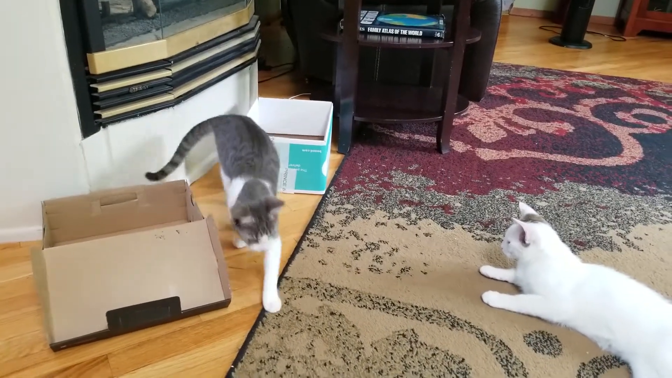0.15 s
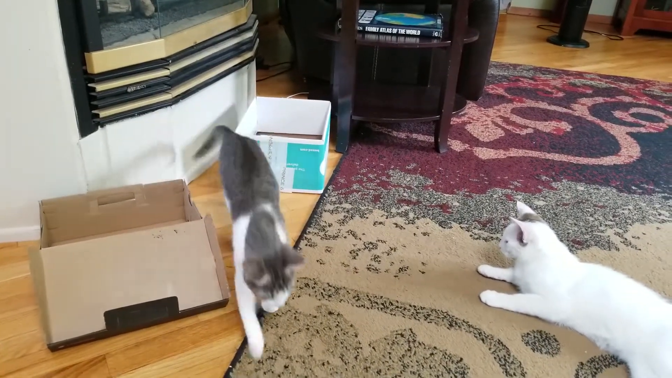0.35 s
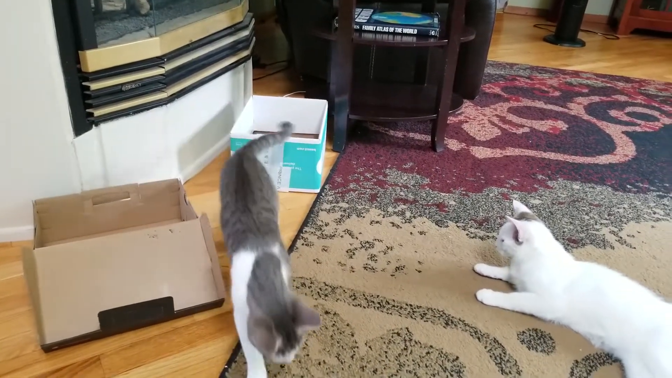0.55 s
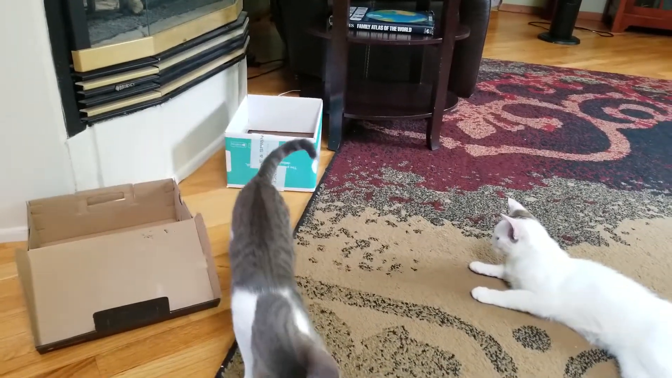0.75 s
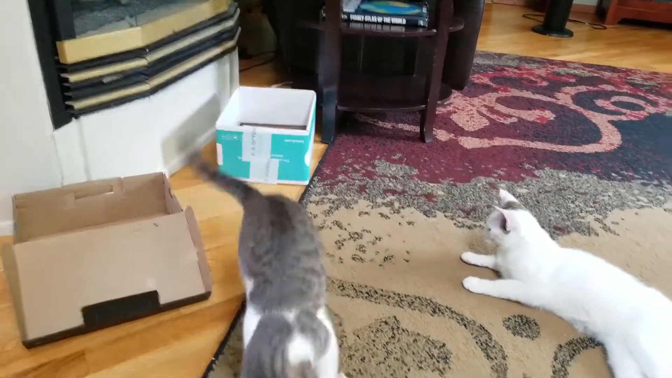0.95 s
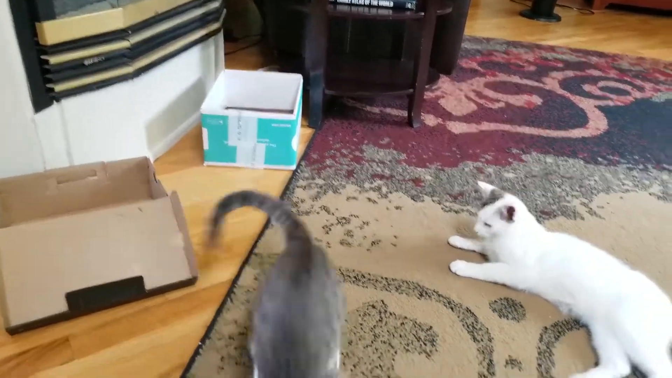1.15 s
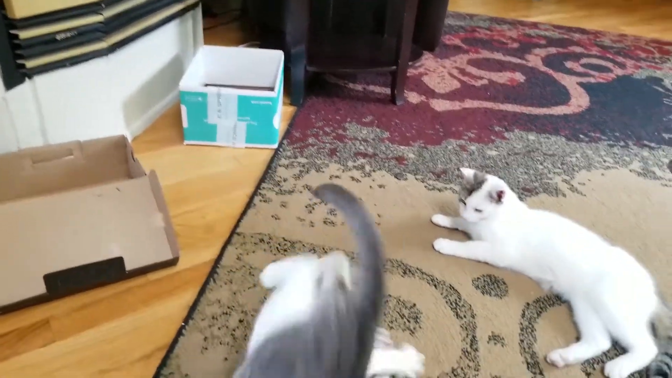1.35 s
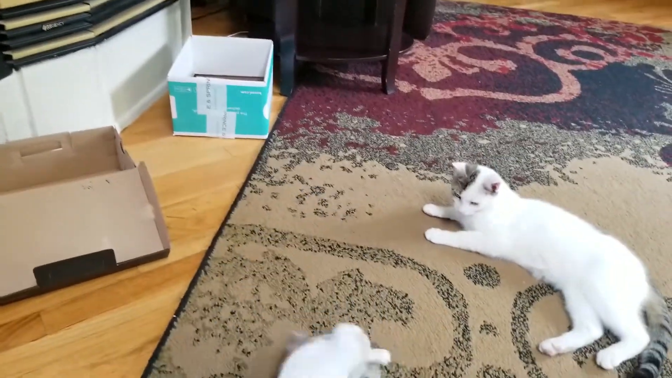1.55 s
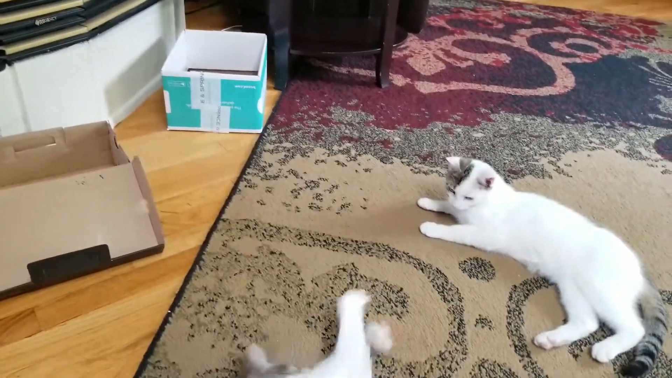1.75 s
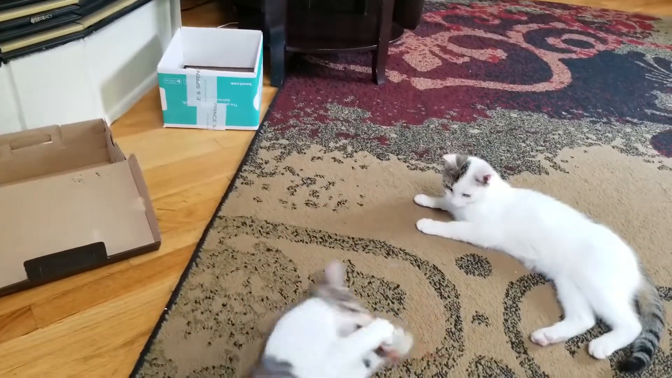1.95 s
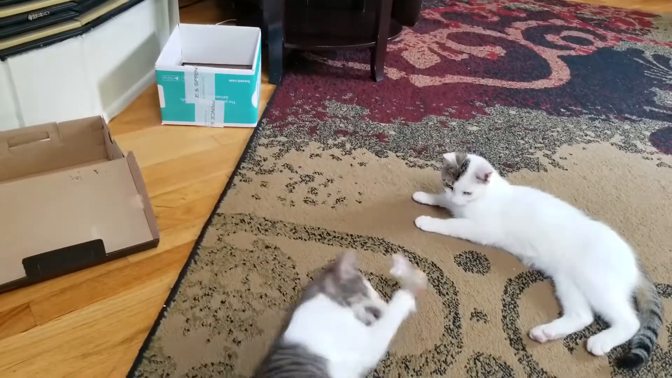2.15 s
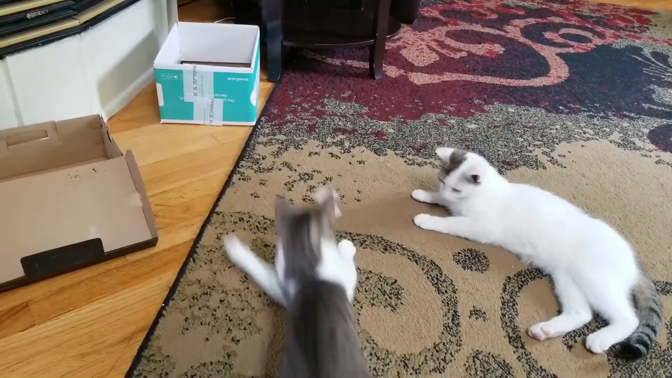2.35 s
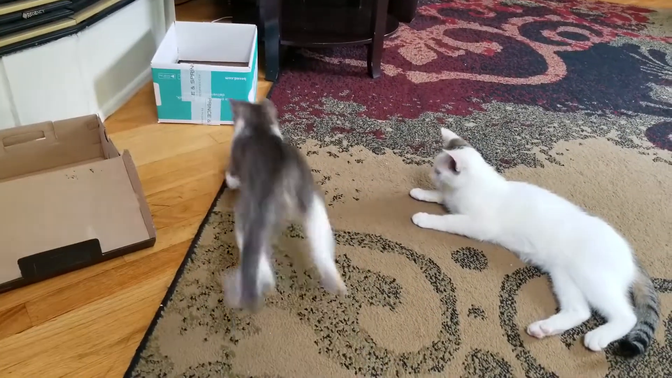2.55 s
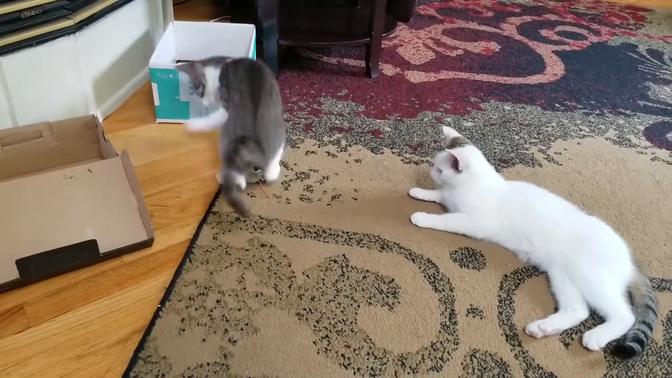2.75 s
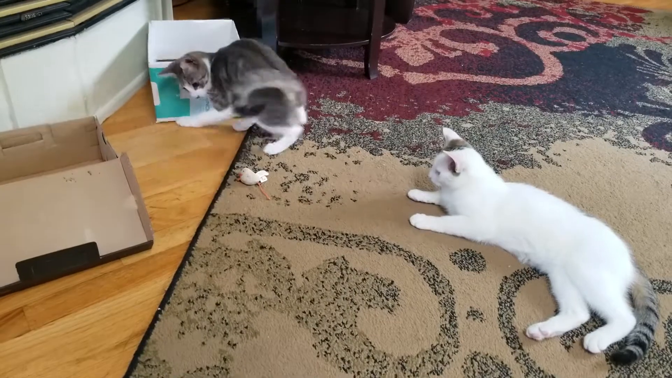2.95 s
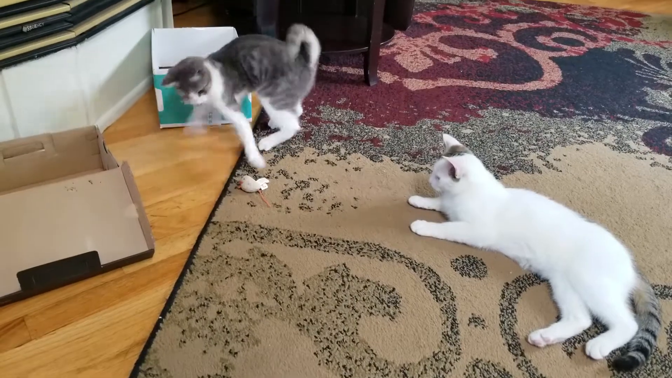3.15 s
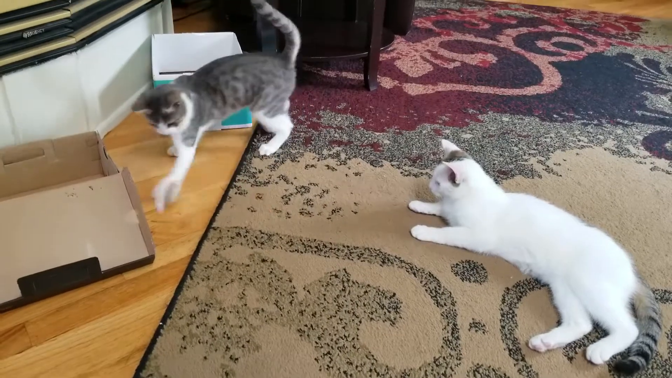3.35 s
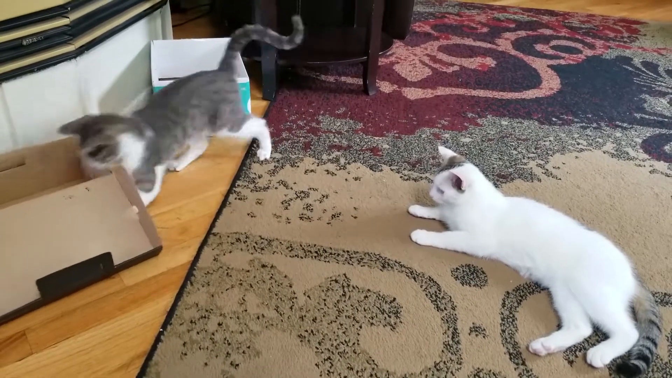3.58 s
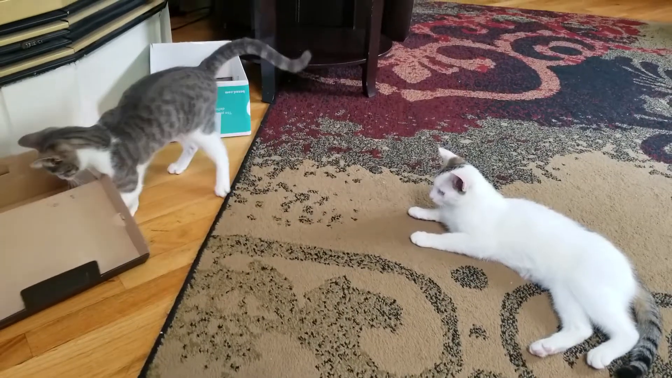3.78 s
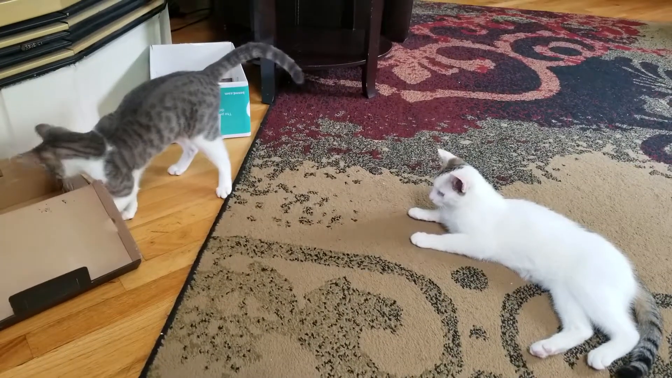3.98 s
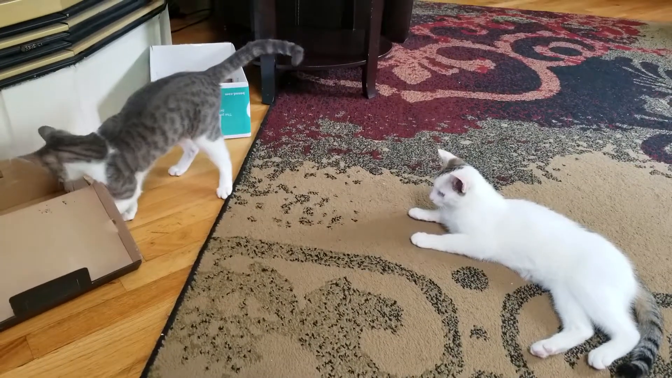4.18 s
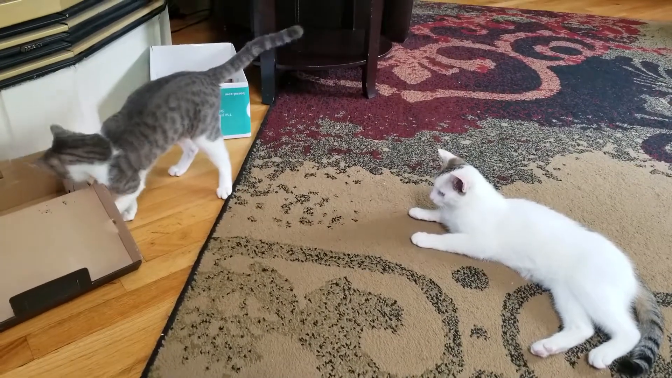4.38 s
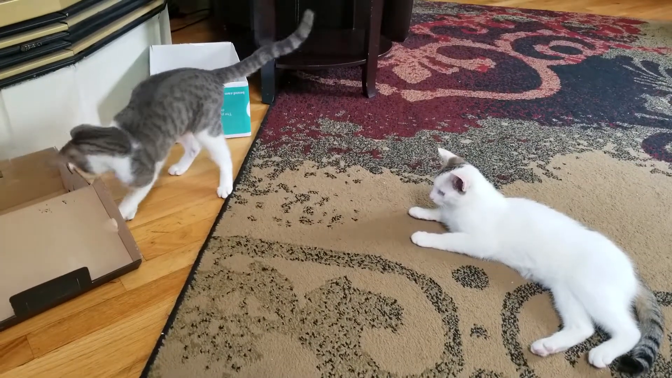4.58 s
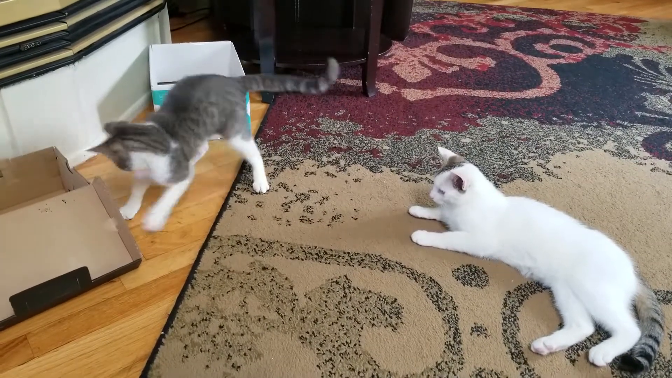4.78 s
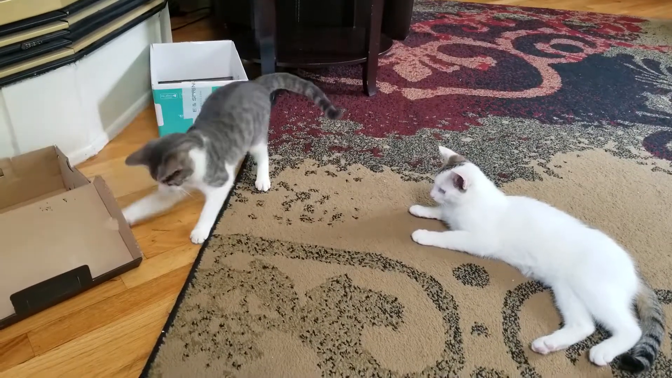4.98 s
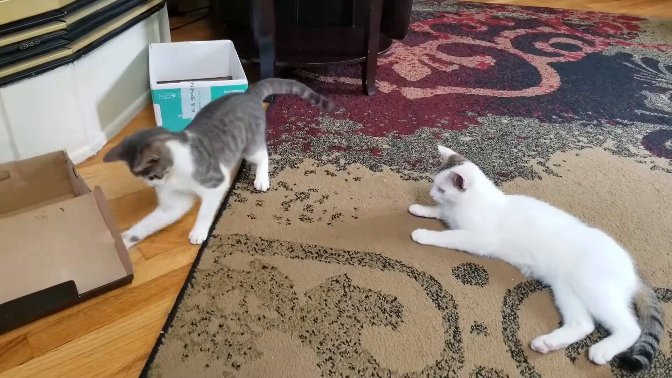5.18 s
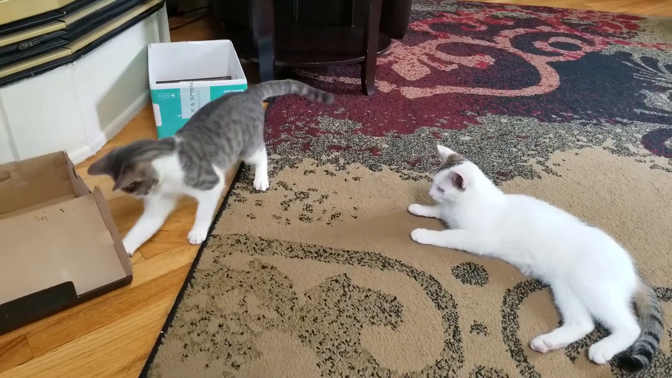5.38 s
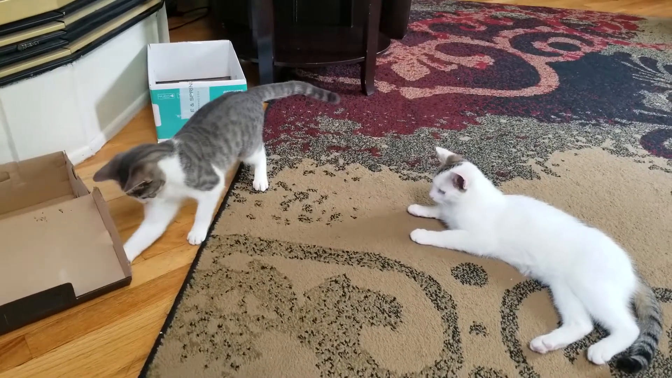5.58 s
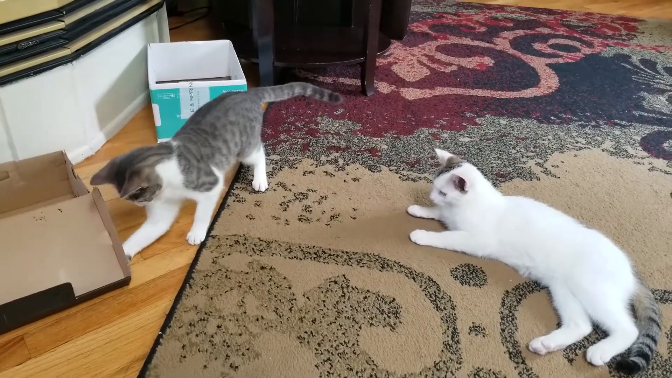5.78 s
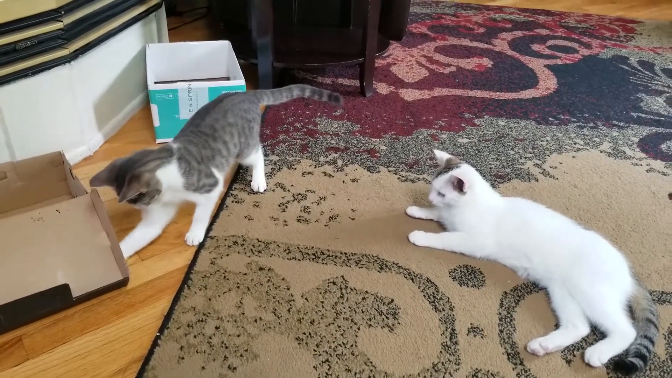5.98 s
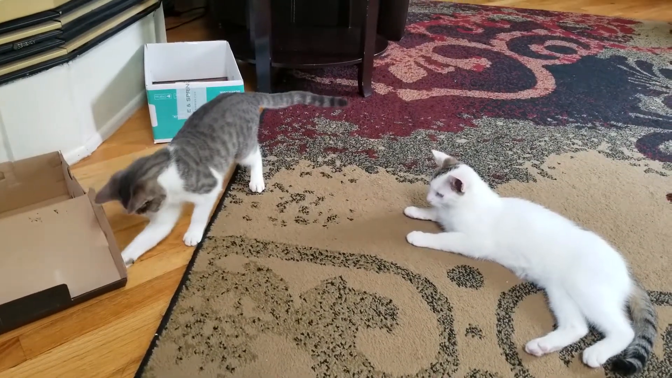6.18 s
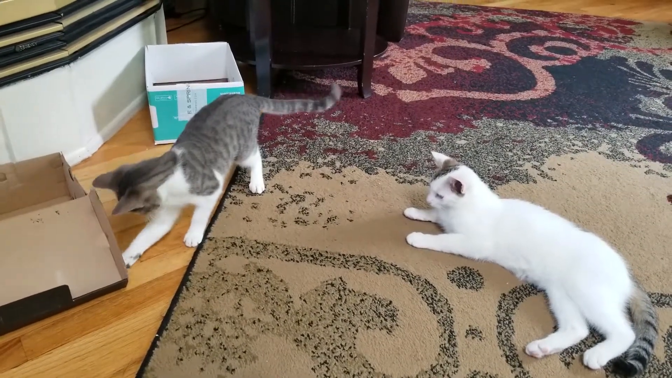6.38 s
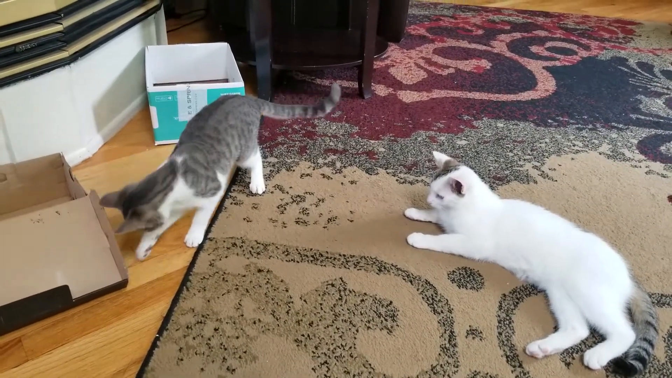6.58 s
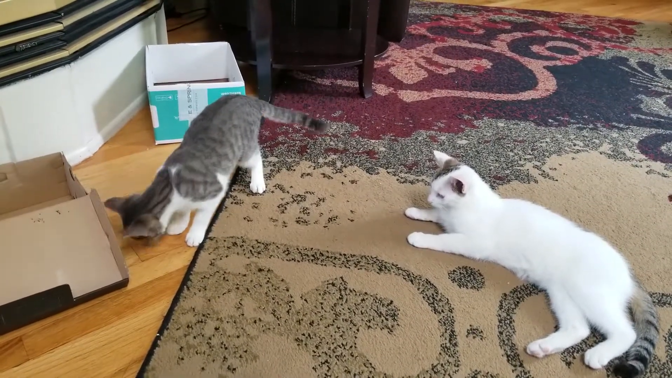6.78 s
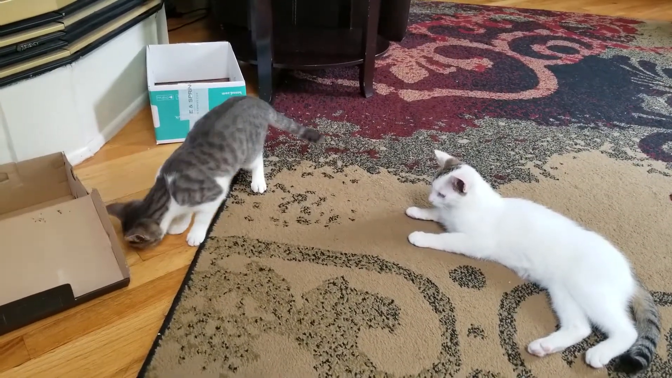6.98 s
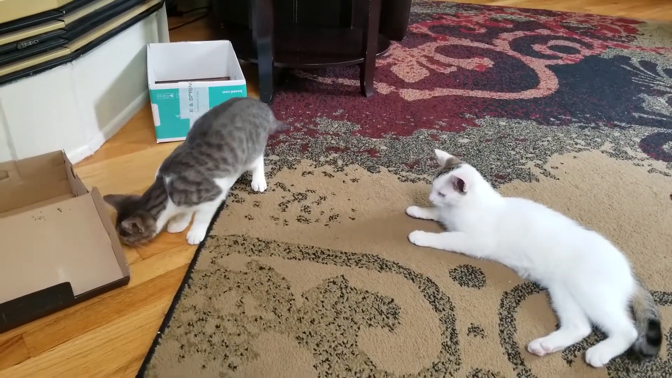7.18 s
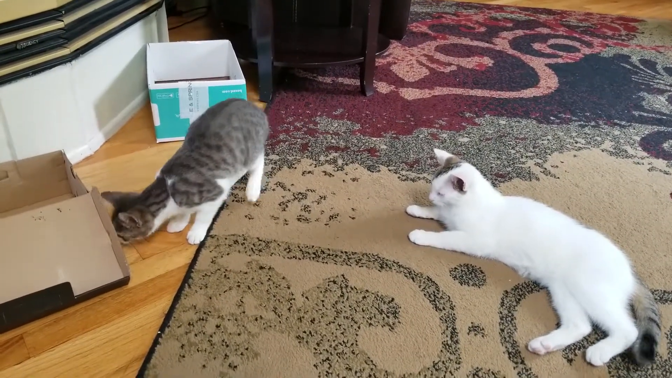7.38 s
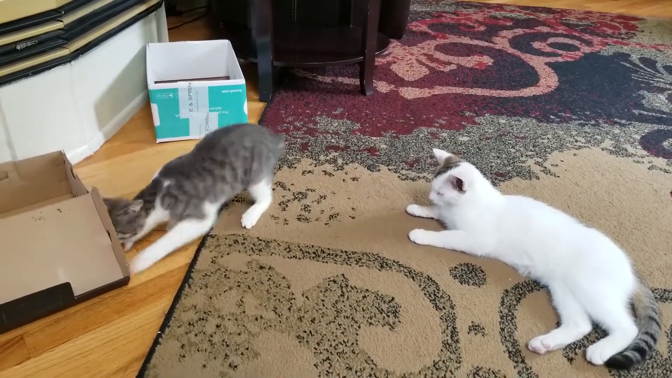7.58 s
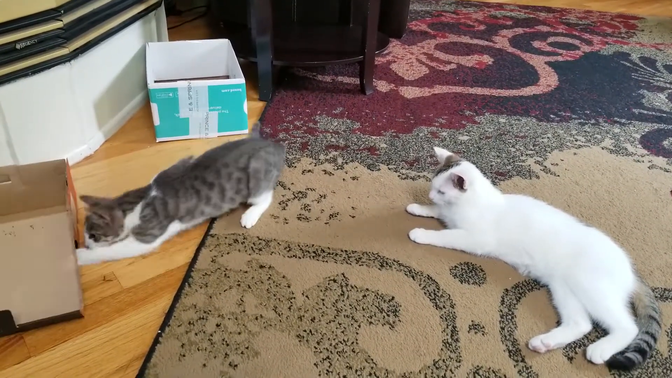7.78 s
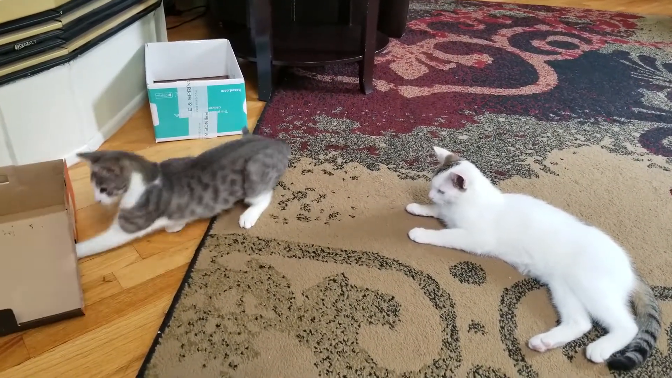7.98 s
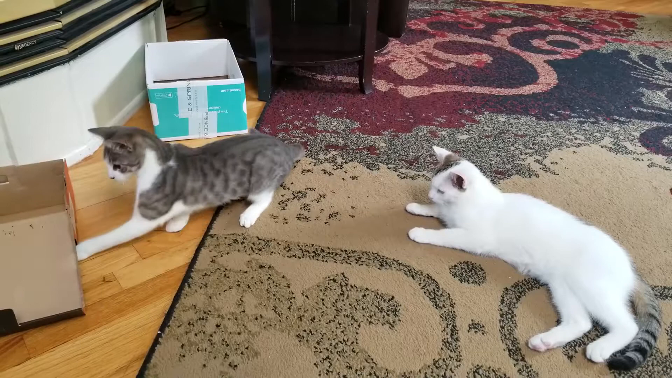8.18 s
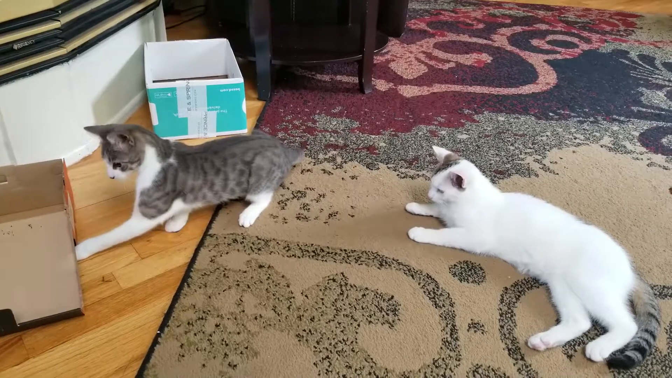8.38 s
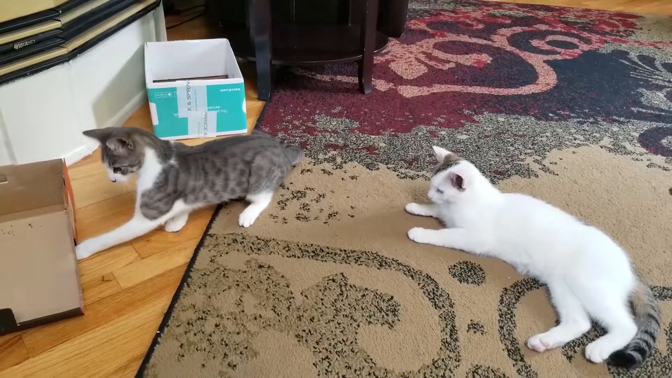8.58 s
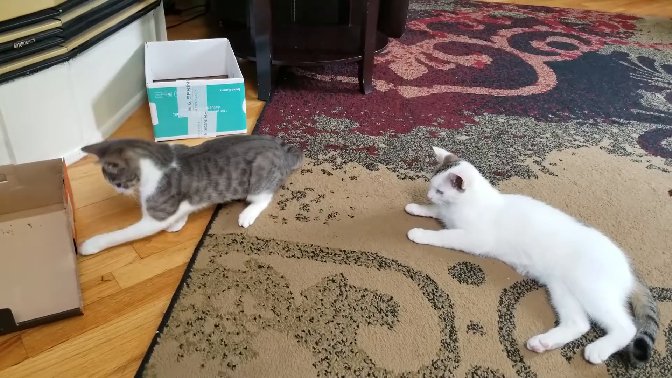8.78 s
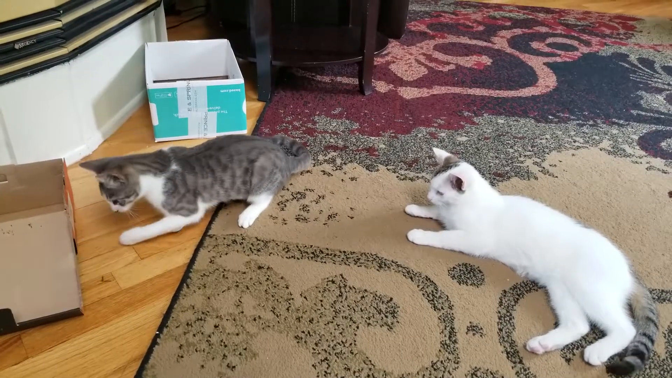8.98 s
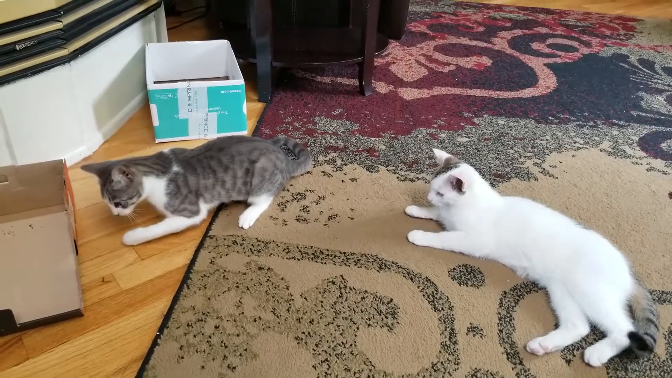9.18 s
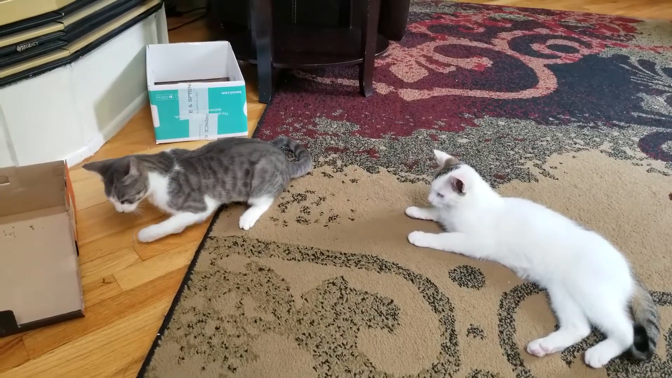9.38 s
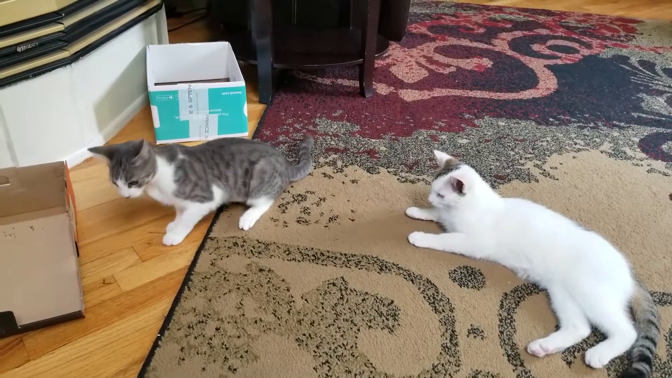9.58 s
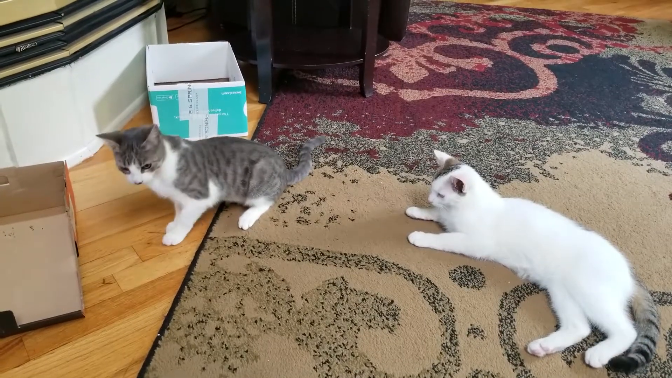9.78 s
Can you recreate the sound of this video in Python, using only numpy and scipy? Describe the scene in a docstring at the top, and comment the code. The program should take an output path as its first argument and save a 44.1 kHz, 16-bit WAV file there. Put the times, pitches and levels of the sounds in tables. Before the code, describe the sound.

In a slightly echoing living room, a fan hums quietly while a kitten plays nearby. Soft steps build into thumping landings and claw scuffs on rug and wood. A little toy chatters and knocks against a hollow cardboard box, loudest about halfway through. A distant bird trills faintly as the knocks die away, and a last short flurry of clacks, knocks and paw thuds leaves only the hum.

```python
"""Kitten, toy and cardboard box.

A kitten romps over a rug and a hardwood floor: fur and claws scuff, paws slap and the boards thud.
It chases a small toy, which clacks and chatters, and bats it against an empty cardboard box whose
hollow note lingers near 540 Hz. The living room rings after each hit.
Behind it all a fan hums steadily, and a faint bird trills once outside."""
import sys
import numpy as np
from scipy import signal
from scipy.fft import rfft, irfft, next_fast_len
from scipy.io import wavfile
from scipy.ndimage import map_coordinates

SR = 44100
rng = np.random.default_rng(int(sys.argv[2]) if len(sys.argv) > 2 else 0)


def inscribe(sig):
    """Save sig as 16-bit PCM at rate SR to the path in sys.argv[1].

    A 1-D sig is mono; a 2-D sig holds one channel per row.
    Samples are clipped to [-1, 1] before scaling.
    """
    pcm = np.round(np.clip(np.atleast_2d(sig).T, -1, 1) * 32767)
    wavfile.write(sys.argv[1], SR, pcm.astype(np.int16))


N = 433803


def amp(db):
    """Decibels to gain."""
    return 10 ** (np.asarray(db) / 20)


def unit(x):
    """Scale to an rms of 1."""
    return x / np.sqrt(np.mean(x ** 2) + 1e-20)


def along(points, hz):
    """Read a curve of (f/Hz, value) points on a log frequency axis."""
    f, v = np.transpose(points)
    return np.interp(np.log(hz + 1), np.log(f), v)


def seconds(length):
    """A time axis."""
    return np.arange(int(length * SR)) / SR


def filtered(x, response):
    """EQ x with a gain given as a function of frequency."""
    n = x.shape[-1]
    size = next_fast_len(n + SR // 10)
    return irfft(rfft(x, size) * response(np.fft.rfftfreq(size, 1 / SR)), size)[..., :n]


def stereo_noise(count, correlation):
    """White noise whose stereo width follows a left-right correlation curve."""
    def mid_side(hz):
        angle = np.arccos(np.clip(along(correlation, hz), -1, 1)) / 2
        return np.array([np.cos(angle), np.sin(angle)])
    mid, side = filtered(rng.standard_normal((2, count)), mid_side)
    return np.array([mid + side, mid - side])


def coloured(burst, eq_db, size=4096):
    """A burst through a minimum-phase EQ, which keeps its attack sharp; unit energy per channel."""
    cepstrum = irfft(np.log(amp(eq_db(np.fft.rfftfreq(size, 1 / SR)))))
    cepstrum[1:size // 2] *= 2
    cepstrum[size // 2 + 1:] = 0
    out = irfft(rfft(burst, size) * np.exp(rfft(cepstrum)))
    return out / np.linalg.norm(out, axis=-1, keepdims=True)


def add(track, s, sound):
    """Mix a stereo sound in at s seconds."""
    start = max(round(s * SR), 0)
    part = sound[:, :max(N - start, 0)]
    track[:, start:start + part.shape[1]] += part


# stereo image of the reverb: f/Hz, left-right correlation
REVERB_IMAGE = [(150, 1), (550, 0.72), (1100, -0.1), (2000, 0.037), (4000, 0.06)]
# decay of the living room: f/Hz, T60/s
REVERB_DECAY = [(100, 0.42), (250, 0.82), (550, 0.43), (1200, 0.69), (2500, 0.64), (5000, 0.58),
                (8000, 0.55), (14000, 0.36)]

def in_room(sound, wet_db, radiated=None, left_db=0.0, left_lead_s=0.00029, build_s=0.0026):
    """The direct sound, placed by level and delay, plus the room's tail from what it radiates."""
    hz, t, spectrum = signal.stft(stereo_noise(SR * 3 // 4, REVERB_IMAGE), SR, nperseg=256)
    decay = amp(-60 * t / along(REVERB_DECAY, hz)[:, None])
    onset = 1 - np.exp(-(t / build_s) ** 2)
    tail = signal.istft(spectrum * decay * onset, SR, nperseg=256)[1]
    direct = sound * np.ones((2, 1))
    out = signal.fftconvolve(direct if radiated is None else radiated[None], tail, axes=1)
    out *= amp(wet_db) * np.linalg.norm(direct) / np.linalg.norm(out)
    right = filtered(direct[1], lambda f: np.exp(-2j * np.pi * f * left_lead_s))
    out[:, :direct.shape[1]] += np.array([direct[0], right]) * amp([[left_db], [-left_db]])
    return out


def ring(modes, attack_s, scatter_db):
    """Damped modes under a soft blow, balanced anew on each hit, with a peak of 1."""
    t = seconds(0.25)
    scatter = scatter_db * rng.standard_normal(len(modes))
    out = sum(amp(db + extra_db - 60 * t / t60) * np.sin(2 * np.pi * hz * t)
              for (hz, db, t60), extra_db in zip(modes, scatter))
    out *= 1 - np.exp(-(t / attack_s) ** 2)
    return out / np.abs(out).max()


def crack(eq_db, t60, wet_db, attack_s=0.0005):
    """A burst of tiny contacts; the room gets their sum over all directions, a smooth spectrum."""
    t = seconds(0.06)
    envelope = amp(-60 * t / t60) * (1 - np.exp(-t / attack_s))
    burst = stereo_noise(len(t), [(600, 1.0), (3000, 0.7), (9000, 0.15)]) * envelope
    return in_room(coloured(burst, eq_db), wet_db, radiated=coloured(np.ones(1), eq_db))


# stereo image of the background bed: f/Hz, left-right correlation
BED_IMAGE = [(60, 0.79), (130, 0.97), (290, 0.95), (640, 0.61), (1410, -0.094), (3100, 0.1), (6820, -0.044),
             (15000, -0.03)]
# EQ of the fan's rush: f/Hz, gain/dB
FAN_EQ = [(12, -63), (20, -24.5), (59, -5), (92, -7), (124, -6), (145, -5.5), (177, -2.5), (209, -9),
          (235, 0), (297, -2), (364, -10), (383, -14.5), (582, -10.5), (915, -22), (1100, -37.5),
          (1430, -60.5), (2420, -120)]
# EQ of the hiss: f/Hz, gain/dB
HISS_EQ = [(530, -32.5), (900, -66), (1030, 3), (1310, 0), (1550, 0.5), (1680, -2), (2450, -4), (3110, -7),
           (3860, -1.5), (5160, -6.5), (7960, -12), (8660, -17), (10000, -16.5), (14500, -12.5),
           (16000, -20)]
# bands of the fan's drone: f/Hz, width/Hz, level/dB
DRONE_BANDS = [(55.7, 5, -68), (118.1, 1.3, -65), (185, 16, -62), (236, 41, -59), (283, 16, -70),
               (315, 10.4, -70.5), (352.6, 77, -64.5)]

def room_tone(fan_db=-53.5, hiss_db=-68.5):
    """The bed: a fan's low rush and narrow droning bands, with a faint even hiss on top."""
    def noise(response):
        return unit(filtered(stereo_noise(N, BED_IMAGE), response))
    def bands(hz):
        return sum(amp(db) / np.sqrt(width) / (1 + ((hz - centre) / width * 2) ** 2)
                   for centre, width, db in DRONE_BANDS)
    rush = amp(fan_db) * noise(lambda hz: amp(along(FAN_EQ, hz)))
    hiss = amp(hiss_db) * noise(lambda hz: amp(along(HISS_EQ, hz)))
    drone = np.linalg.norm([amp(db) for _, _, db in DRONE_BANDS]) * noise(bands)
    return rush + hiss + drone


# fader ride of the trill: t/s, level/dB
TRILL_SWELL = [(4.55, -77), (4.8, -63), (5.5, -57.5), (5.95, -57.5), (6.2, -66), (6.3, -72.5)]

def bird(trim_db=-6, chirp_s=0.026, spacing_s=0.0797, slur_db=-10):
    """A trill of falling chirps, each trailed by a softer, lower slur, heard mostly as reverb."""
    track = np.zeros((2, N))
    progress = seconds(chirp_s) / chirp_s
    def sweep(top_hz, fall_hz):
        phase = 2 * np.pi * np.cumsum(top_hz - fall_hz * progress) / SR
        return np.sqrt(np.sin(np.pi * progress)) * np.sin(phase)
    starts = np.arange(4.573, 6.25, spacing_s)
    for s, (detune, jitter_db) in zip(starts, rng.standard_normal((len(starts), 2))):
        gain = amp(np.interp(s, *np.transpose(TRILL_SWELL)) + jitter_db + trim_db)
        chirp = sweep(top_hz=6600 * (1 + 0.008 * detune), fall_hz=1350)
        slur = sweep(top_hz=5900, fall_hz=1900)
        add(track, s, gain * in_room(chirp, wet_db=7, left_lead_s=0, build_s=0.025))
        add(track, s + chirp_s, gain * amp(slur_db) * in_room(slur, wet_db=14, build_s=0.025))
    return track


# EQ of the friction: f/Hz, gain/dB
SCUFF_EQ = [(150, 9), (700, 5.5), (1500, -2), (3000, 0.5), (5000, 0), (8000, -5), (9200, -14),
            (12500, -5.5), (16000, -8)]
# claws and fur dragged over rug and wood: t/s, length/s, level/dB
SCUFF_CUES = [(1.084, 0.061, -59.5), (1.543, 0.59, -58.5), (2.098, 0.38, -66.5), (2.795, 0.29, -42),
              (3.427, 0.071, -51.5), (3.666, .29, -59.5), (5.008, 0.029, -45), (5.083, .043, -49),
              (7.627, 0.16, -49), (8.0, .15, -62), (8.689, 0.076, -70.5)]

def scuffs(trim_db=-2, grain_db=7, grains_per_s=300):
    """Fibres catch and slip: grainy noise in strokes that swell fast and fade."""
    track = np.zeros((2, N))
    noise = stereo_noise(N, [(600, 1.0), (4000, 0.3)])
    catches = map_coordinates(rng.standard_normal(N // 10), [np.arange(N) * grains_per_s / SR], order=1)
    friction = unit(filtered(noise * amp(grain_db * catches), lambda hz: amp(along(SCUFF_EQ, hz))))
    for s, length, db in SCUFF_CUES:
        t, start = seconds(length), round(s * SR)
        stroke = np.sin(np.pi * np.sqrt(t / length)) * friction[:, start:start + len(t)]
        add(track, s, amp(db + trim_db) * in_room(stroke, wet_db=3.5, left_db=0.5))
    return track


# floorboard modes: f/multiple of the thud's pitch, level/dB, T60/s
BOARD_MODES = [(0.601, -10, 0.091), (1, 0, 0.1), (1.5, -9.5, 0.066), (2.1, -12.5, .05)]
# paws and body landing: t/s, thud level/dB, thud f/Hz, slap level/dB, claw brightness/dB
LANDING_CUES = [(1.087, -36, 99.5, -45.5, 0), (1.231, -43, 262, -43, -16.5),
                (1.463, -31.5, 99, -41.5, -10.5), (1.563, -27.5, 168, -26.5, -24),
                (1.593, -24.5, 148, -25, -22), (1.688, -37, 142, -39, -15.5), (1.745, -34.5, 176, -43, -26),
                (1.771, -40, 135, -37.5, -16.5), (2.283, -32.5, 157, -41.5, -30),
                (2.516, -33.5, 140, -46.5, -25), (2.653, -36, 125, -46, -30), (2.781, -26, 194, -42, -22),
                (2.841, -23, 187, -33, -18), (2.94, -19.5, 208.5, -28.5, -9),
                (3.008, -18.5, 191, -33.5, -25), (3.455, -27, 210, -33, -21), (7.749, -30.5, 201, -50, -25),
                (7.918, -28, 206, -31, -14.5)]

def floor_thuds(attack_s=0.006, settle_s=0.01588, settle_db=-4.5):
    """Steps, landings and knocks on the box flex the boards, deeper through the rug than on bare wood."""
    track = np.zeros((2, N))
    # blows to the floor: t/s, level/dB, f/Hz
    walk = [(0.289 + step * 0.28, -47, 91) for step in range(3)]
    pads = [(s, db, hz) for s, db, hz, _, _ in LANDING_CUES]
    heaviest_db = max(db for _, db, _ in pads)
    # body weight follows the pads, and counts for less in a light landing
    weight = [(s + settle_s, db + settle_db - (heaviest_db - db), hz) for s, db, hz in pads]
    under_box = [(s, db - 16, 275) for s, db, _ in KNOCK_CUES]
    for s, db, pitch_hz in walk + pads + weight + under_box:
        modes = [(pitch_hz * ratio, level, t60) for ratio, level, t60 in BOARD_MODES]
        thud = ring(modes, attack_s, scatter_db=5.5)
        add(track, s - attack_s / 2, amp(db) * in_room(thud, wet_db=-7, left_db=-0.75))
    return track


# EQ of a soft slap: f/Hz, gain/dB
SLAP_EQ = [(60, -14), (250, -4.5), (450, 0), (750, 0), (950, -8), (1700, -9), (2500, -19.5), (4000, -20),
           (8000, -27.5), (9200, -39.5), (15000, -35.5)]

def slaps(trim_db=19, cardboard_tick_db=-15.5):
    """Each landing slaps the floor and each knock a box panel; claws or cardboard add a tick on top."""
    track = np.zeros((2, N))
    paws = [(s, db, claw_db) for s, _, _, db, claw_db in LANDING_CUES]
    panels = [(s, db, cardboard_tick_db) for s, _, db in KNOCK_CUES]
    for s, db, tick_db in paws + panels:
        shelf = [(1500, 0), (4500, tick_db + 16.5)]
        eq_db = lambda hz: along(SLAP_EQ, hz) + along(shelf, hz)
        add(track, s, amp(db + trim_db) * crack(eq_db, t60=0.032, wet_db=-3))
    return track


# modes of the empty box: f/Hz, level/dB, T60/s
BOX_MODES = [(94.8, -21, 0.0753), (246, -21, 0.02), (562.2, 2, 0.041), (538.7, -14.5, 0.4),
             (608, -5, 0.052), (696, -4.5, 0.059), (764, -13.5, 0.051), (1110, -11, .035)]
# knocks on the box: t/s, note level/dB, panel slap level/dB
KNOCK_CUES = [(2.848, -27.5, -50), (3.437, -35.5, -48.5), (3.469, -24.5, -27), (3.492, -16, -33),
              (5.021, -26, -36), (5.074, -35, -42), (5.185, -9, -13.5), (5.237, -21, -34),
              (5.447, -25, -42), (5.656, -30, -48), (7.615, -25, -49), (7.679, -21, -24)]

def box_knocks(attack_s=0.0024):
    """The cardboard panels and the air between them give a short hollow note."""
    track = np.zeros((2, N))
    for s, db, _ in KNOCK_CUES:
        note = ring(BOX_MODES, attack_s, scatter_db=2.7)
        add(track, s - attack_s / 2, amp(db) * in_room(note, wet_db=-8.5))
    return track


def chatter(strikes, gap_s=0.0072, loss_db=10, blunting_db=7.5, rebound_hz=3080):
    """Each hard strike bounces into two quick, blunter rebounds, the second weaker than the first."""
    for s, db, body_db, edge_db, ring_hz, rebound_db in strikes:
        yield s, db, body_db, edge_db, ring_hz
        for k in range(2):
            bounce_db = db + rebound_db - k * loss_db
            yield s + (k + 1) * gap_s, bounce_db, body_db, edge_db - blunting_db, rebound_hz


# EQ of a hard contact: f/Hz, gain/dB
CLACK_EQ = [(100, -26), (400, -16), (700, -7), (900, -15.5), (1120, -11), (1500, -6), (1900, -2.5),
            (2500, -1.5), (3250, -4.5), (4100, -5), (5500, -9), (8000, -18.5), (9200, -29.5),
            (12500, -24.5), (16000, -27)]
# strikes of toy, claws and box edge:
# t/s, level/dB, body/dB, edge/dB, ring f/Hz, first rebound/dB over the strike
CLACK_CUES = [(2.7804, -13, -10, -21.5, 2800, -4), (3.4292, -39.5, -6, -8, 3120, -8),
              (3.5011, -8, -19, -13, 4500, -1.5), (4.656, -35, -11.5, -21.5, 3280, 1),
              (4.9612, -28, -9.5, -11.5, 3450, 0.5), (5.1835, -3, -8.5, -14, 2496, -2),
              (7.6054, -16.5, -4, -13, 4820, 7.5), (7.8211, -15.5, -21.5, -11, 4530, -5)]

def clacks(trim_db=12, ring_db=5, ring_octaves=0.08, ripple_db=2.6, hardest_t60=0.008, softening=0.5):
    """Hard contacts crack briefly; light ones graze for longer, and the spot struck sets the colour."""
    track = np.zeros((2, N))
    ripple_hz = np.geomspace(500, 16000, 50)
    loudest_db = max(row[1] for row in CLACK_CUES)
    for s, db, body_db, edge_db, ring_hz in chatter(CLACK_CUES):
        ripple = np.c_[ripple_hz, ripple_db * rng.standard_normal(len(ripple_hz))]
        tilt = [(1500, body_db + 16), (2800, 0), (3600, 0), (5200, edge_db + 16)]
        resonance = lambda hz: ring_db / (1 + (np.log2((hz + 1) / ring_hz) / ring_octaves) ** 2)
        eq_db = lambda hz: along(CLACK_EQ, hz) + along(tilt, hz) + along(ripple, hz) + resonance(hz)
        t60 = hardest_t60 * amp(softening * (loudest_db - db))
        add(track, s, amp(db + trim_db) * crack(eq_db, t60, wet_db=0.4))
    return track


# panning of the kitten's play: f/Hz, left boost and right cut/dB
PLAY_PAN = [(100, 1.5), (500, 0.66), (1200, 0.66), (4000, -1), (8000, -0.4), (13000, 1.5)]

def scene():
    """The kitten's play, panned slightly by frequency, over the bird and the room tone."""
    play = clacks() + box_knocks() + floor_thuds() + slaps() + scuffs()
    play = filtered(play, lambda hz: amp(np.outer([1, -1], along(PLAY_PAN, hz))))
    return play + bird() + room_tone()


def record(dry, low_cut_hz=32, top_hz=16050):
    """Master EQ: a gentle low cut and a brick wall above the highest treble."""
    return filtered(dry, lambda hz: 1j * hz / (1j * hz + low_cut_hz) * (hz < top_hz))


dry = scene()
out = record(dry)
inscribe(out)
```